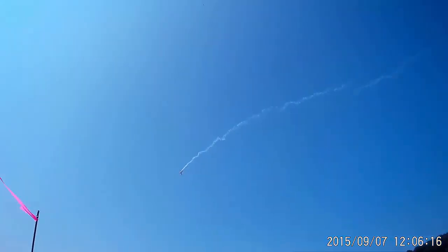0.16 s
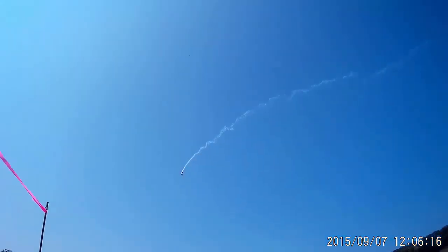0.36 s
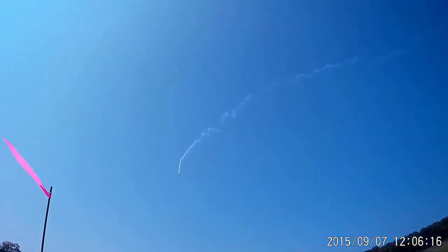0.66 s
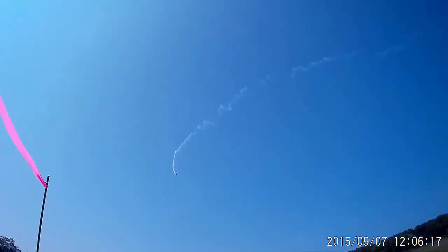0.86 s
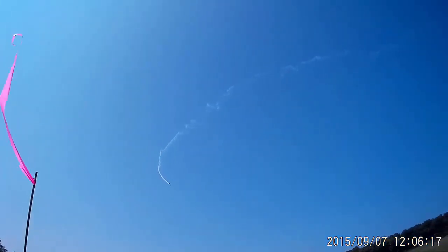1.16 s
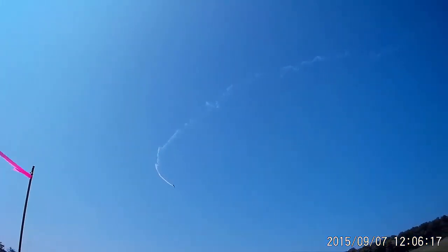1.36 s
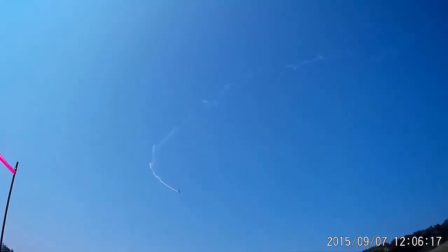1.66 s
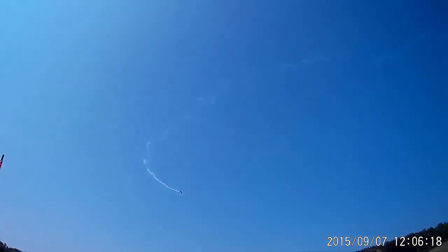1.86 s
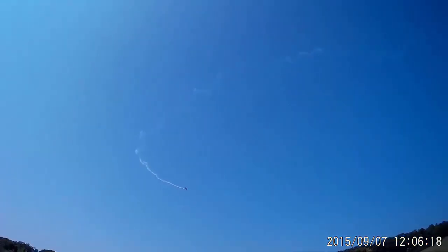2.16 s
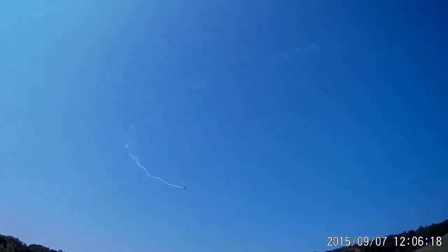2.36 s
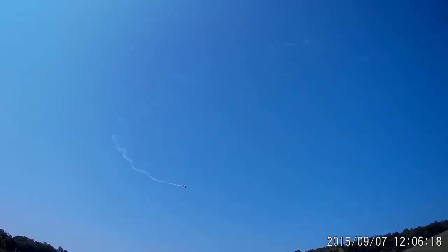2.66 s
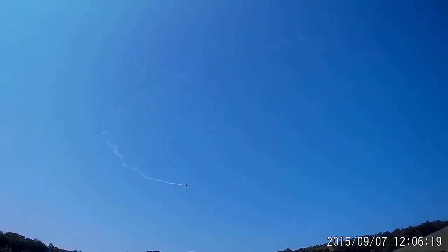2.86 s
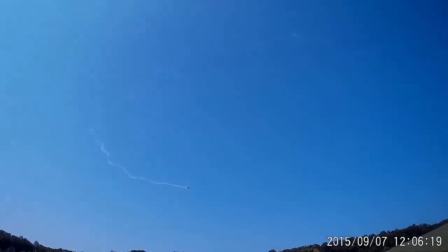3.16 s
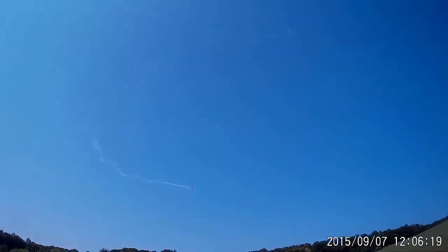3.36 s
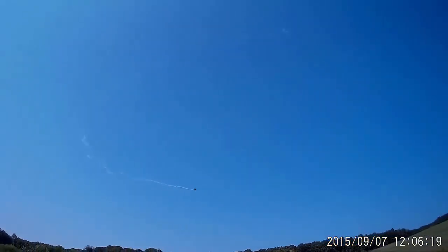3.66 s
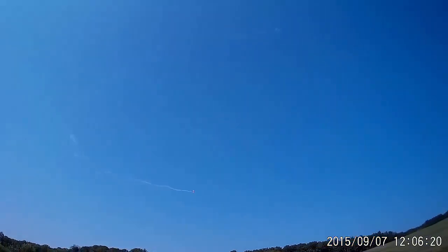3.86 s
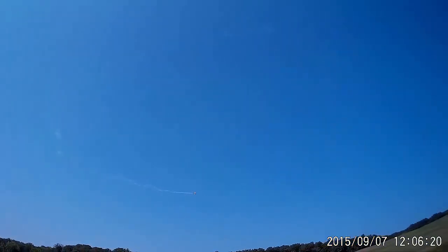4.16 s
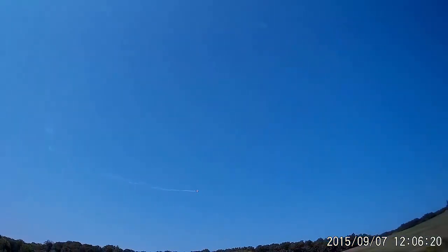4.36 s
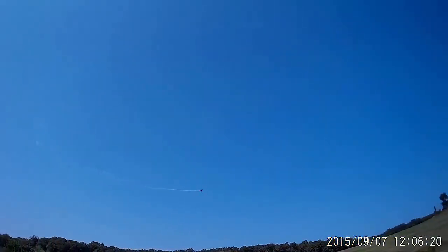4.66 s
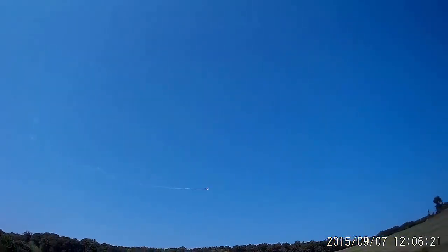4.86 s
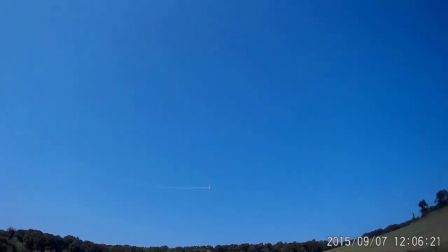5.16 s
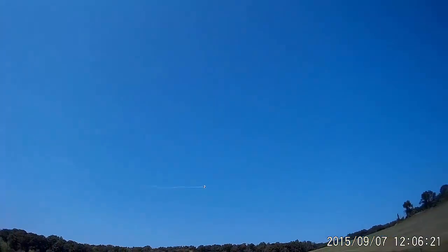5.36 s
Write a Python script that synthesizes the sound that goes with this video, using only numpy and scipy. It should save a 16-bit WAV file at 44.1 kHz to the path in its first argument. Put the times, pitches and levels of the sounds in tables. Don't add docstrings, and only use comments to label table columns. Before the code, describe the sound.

A far-off model plane's raspy buzz fades into a low propeller drone beneath strong buffeting wind, steady hiss and occasional tiny clicks.

```python
import sys
import numpy as np
from scipy import signal
from scipy.fft import rfft, irfft
from scipy.io import wavfile
from scipy.ndimage import uniform_filter1d

SR = 44100
rng = np.random.default_rng(int(sys.argv[2]) if len(sys.argv) > 2 else 0)


def dump_mix(stems):
    frames = np.atleast_2d(stems).T
    limited = np.clip(frames, -1, 1)
    pcm = np.round(limited * 32767).astype(np.int16)
    wavfile.write(sys.argv[1], SR, pcm)


N = 243431
T = np.arange(N) / SR

# start_s [s], firing_hz [Hz], hum_db [dB]
REVS = [(0.0, 110.7, -36), (.2, 109.3, -32), (.45, 108.3, -32), (.65, 106.5, -39), (1.06, 104, -41.5),
        (1.7, 103.8, -44), (2.1, 105.1, -36.5), (2.45, 105.7, -33), (2.68, 105.9, -35), (2.9, 105.1, -34.5),
        (3.3, 105.5, -29.5), (3.58, 106.1, -32), (3.88, 106.1, -35), (4.15, 107.5, -30), (4.62, 110.8, -41),
        (4.93, 109.6, -37), (5.3, 111.6, -35), (5.52, 111, -40)]
# start_s [s], level_db [dB], tail_on [0-1, view of the pipe], steady [0-1, firing over gas rush]
EXHAUST = [(0.0, -41.5, 0.6, 0.72), (.2, -39, 0.47, 0.72), (.4, -38, 0.43, 0.7), (.55, -40, 0.45, 0.57),
           (.7, -51, 0.72, .65), (1.08, -48, 0.67, 0.39), (1.17, -49.5, 0.56, 0.25), (1.6, -52, .7, 0.38),
           (2.0, -51.5, 0.76, 0.32), (2.4, -53, 0.62, 0.4), (2.68, -55.5, 0.84, 0.57),
           (3.05, -54, 0.56, 0.1), (3.55, -62, 0.95, 0.52), (3.95, -54, 0.37, 0.3), (4.35, -50, 0.43, 0.7),
           (4.75, -57.5, 0.03, 0.5), (5.1, -52, .2, 0.76), (5.52, -54, 0.67, 1)]
# pitch_hz [Hz], width_hz [Hz], level_db [dB]
PIPE = [(873, 270, -1), (1086, 245, 3.5), (1317, 266, 0.5), (1476, 212, 4.5), (1747, 580, 2.5),
        (2165, 480, -0.5), (3260, 590, 5.5), (3690, 740, -2), (4350, 600, 2.5), (5200, 1200, -44)]
# start_s [s], delay_ms [ms], echo [0-1]
GROUND = [(0, 5.5, 0.54), (.65, 5.07, 0.64), (1.25, 4.4, 0.3), (1.95, 3.9, 0.84), (2.75, 3.26, 1),
          (3.45, 3.54, 0.2), (4.3, 3.03, 0.8), (5.52, 3.15, 1.)]
# start_s [s], length_s [s], level_db [dB], centre_hz [Hz]
TWINKLES = [(0.0, 0.044, 6.5, 1250), (.0, .025, 7, 3320), (.155, 0.031, 13.5, 4470), (.2, 0.035, 3.5, 1500),
            (.32, .06, 5, 3600), (.075, .035, -9.5, 3500), (.34, 0.074, 9, 4800), (1.03, .1, -6, 4600),
            (.75, 0.042, 7.5, 4600), (.86, 0.097, 10.5, 2050), (.92, 0.066, 8, 3500), (1.07, .05, 9, 3000),
            (1.57, 0.11, 8, 1900), (1.7, 0.069, 8, 3400), (.6, 0.05, 5, 3020), (2.14, 0.031, 4.5, 1400),
            (2.33, 0.078, 6.5, 1950), (2.3, 0.051, 5, 1050), (2.62, 0.064, 10, 1500),
            (1.33, 0.38, -8, 2320), (3.45, 0.059, 9, 2100), (3.64, 0.016, 0, 1500), (3.85, 0.076, 8, 1700),
            (4.2, 0.046, 4.5, 1450), (4.53, 0.068, 7, 1500), (4.69, 0.055, -9, 1600), (4.83, .04, 9, 1500),
            (5.2, 0.076, 13, 1740), (5.2, .04, 13, 3500), (5.46, 0.034, 3.5, 1500)]
# start_s [s], length_s [s], level_db [dB], order [of firing rate]
BEAMS = [(.05, .1, 3.5, 11), (.1, .15, -13, 16), (.3, .2, 2.5, 14), (.35, .2, 3, 12), (.85, .2, 7, 23),
         (.85, 0.22, 7.5, 19.5), (1.2, .15, 8.5, 17), (1.5, .2, 7.5, 18), (2.0, 0.12, 6, 16),
         (2.05, 0.18, 9.5, 20.5), (2.35, .06, 10.5, 19), (2.5, 0.25, 12.5, 10), (2.6, .12, 9.5, 8),
         (2.32, .1, 6, 17), (1.08, .06, 10, 22), (2.6, 0.1, 3, 21), (2.5, 0.25, 10, 13), (2.82, .08, 5, 19),
         (3.0, .3, -0.5, 14), (3.1, .4, 8, 16), (3.82, .15, 9, 16), (3.85, .1, 7, 19), (4.2, .25, 5, 11),
         (5.15, .3, -7, 15), (4.5, .1, 3.5, 12), (4.7, .3, 8, 14), (4.7, .4, -6.5, 13), (5.25, .3, 6.5, 11),
         (5.3, .3, 3, 18), (5.2, .4, -3, 8)]
# start_s [s], level_db [dB], speed [0-1, above the usual]
WIND = [(0.0, -21, 0.65), (.3, -22.5, 0.7), (.55, -18.5, 0.65), (1.0, -20, 0.79), (1.35, -22, 0.77),
        (1.6, -23.5, 0.64), (1.9, -19, 0.47), (2.2, -22.5, 0.53), (2.5, -23, 0.43), (2.8, -25.5, 0.55),
        (3.2, -20, 0.46), (3.5, -24.5, 0.49), (3.8, -25, 0.42), (4.1, -18, .3), (4.55, -18.5, 0.37),
        (4.8, -21.5, 0.04), (5.35, -24.5, 0.21), (5.52, -35.5, 0.32)]
# pitch_hz [Hz], level_db [dB per Hz]
EDDIES = [(12, -44), (22, -9.5), (60, -1.5), (150, -2), (260, -9.5), (380, -18.5), (520, -30.5),
          (650, -43.5), (900, -70), (1500, -80.5)]
# start_s [s], length_s [s], level_db [dB], eddy_hz [Hz]
GUSTS = [(.14, 0.053, 11, 70.5), (.46, 0.054, 5, 150), (.6, 0.029, 6, 170), (.68, 0.0092, 12, 70),
         (.78, .03, -9, 60), (.35, 0.06, -3, 228), (.87, 0.045, -12.5, 60), (.92, 0.087, 8, 75),
         (1.15, 0.0059, 12.5, 130), (1.27, 0.032, 4, 60.3), (1.49, 0.036, 8.5, 90), (1.68, .04, 11.5, 170),
         (2.08, 0.055, 7.5, 220), (2.38, 0.069, -7, 99), (2.58, 0.041, 8, 171), (2.86, .03, -9, 179.9),
         (2.7, 0.033, -3, 420), (3.1, 0.049, 2.5, 420), (3.21, .05, 4, 90), (3.4, .03, 3, 120),
         (3.628, 0.034, 12.5, 130), (3.675, 0.024, -5, 170), (3.87, 0.061, 8.5, 130),
         (4.06, 0.03, 5.5, 220), (4.17, .015, -25, 250), (4.32, 0.019, 7.5, 170), (4.44, 0.014, 10, 149.2),
         (4.62, 0.057, 11.5, 200), (5.05, 0.047, -8.5, 130.6), (5.13, 0.052, 6.5, 190)]
# start_s [s], peak_db [dB], eddy_hz [Hz]
BUFFETS = [(0.086, -5, 214), (0.549, -7, 170), (.757, -4.5, 184), (.862, -7.5, 172), (1.097, -7, 190),
           (1.477, -6, 190), (2.038, -17, 171.6), (2.438, -7.5, 213), (2.953, -12.5, 175), (3.142, -7, 213),
           (3.21, -4, 267), (3.326, -14.5, 300.2), (3.641, -1.5, 245.3), (3.856, -8, 232),
           (4.119, -5.5, 176), (4.205, -5, 184), (4.436, -9, 158.2), (4.509, -4, 189), (4.621, -6, 170.9),
           (4.693, -4, 166.2), (4.734, -12, 217)]
# start_s [s], pitch_hz [Hz], level_db [dB]
CHIRP = [
    (1.78, 8250, -95),
    (1.79, 8270, -66),
    (1.845, 8370, -64),
    (1.88, 8420, -77),
    (1.9, 8420, -95),
]
# start_s [s], level_db [dB]
HISS = [(0.0, -60), (.28, -58.5), (.33, -54.5), (.68, -59.5), (.74, -61), (.89, -58), (1.12, -64.5),
        (1.47, -57.5), (2.04, -55), (2.57, -57.5), (3.2, -55), (3.86, -56), (4.06, -59), (4.5, -58),
        (4.7, -62), (4.97, -54.5), (5.07, -60.5), (5.3, -56)]
# pitch_hz [Hz], level_db [dB per Hz]
HISS_COLOUR = [(300, 17.5), (700, 14), (1500, 14.5), (2800, 4.5), (5200, 0.5), (12800, -3.5), (14000, -6.5),
               (15000, -17), (15400, -51), (16000, -60)]
# start_s [s], step [signed, full scale 1]
DROPOUTS = [
    (.28678, -0.052),
    (1.2866, 0.069),
    (2.285, -0.0087),
    (3.2867, -0.044),
    (5.2866, -0.045),
]


def firings(turns, steady):
    pulses = 0
    for order in range(6, 56):
        path_db = 1.3 * walk(9)
        if 7 < order < 25:
            path_db = path_db + swells(BEAMS, order, octaves=0.05)
        pulses = pulses + undb(path_db) * np.cos(2 * np.pi * order * turns + 0.22 * walk(6))
    puff = 0.5 + np.exp(-(turns % 1) / 0.5)
    gas = unit(puff * rng.standard_normal(N))
    return np.sqrt(steady) * unit(pulses) + np.sqrt(1 - steady) * 1.05 * gas


def off_the_ground(direct):
    delay_ms, echo = curves(GROUND)
    dull = uniform_filter1d(direct, size=9)
    bounce = np.interp(T - delay_ms / 1000, T, dull)
    return (direct + echo * bounce) / np.sqrt(1 + 1.3 * echo ** 2)


def exhaust(drive, level_db, tail_on):
    rings = []
    for hz, width, db in PIPE:
        flicker_db = hz / 1300 * walk(22) + swells(TWINKLES, hz, octaves=0.45)
        rings.append(undb(db + flicker_db) * band(drive, hz, width))
    main = unit(rings[2] - rings[3])
    lower = unit(rings[0] - rings[1])
    upper = unit(rings[4] - rings[5])
    rasp = unit(rings[6] - rings[7] + rings[8] - rings[9])
    mix = main + undb(-11 + 11 * tail_on) * lower
    mix = mix + undb(-10.5 + 17 * tail_on) * upper
    mix = mix + undb(-23 + 16.5 * tail_on) * rasp
    return undb(level_db) * mix


def propeller(turns, hz, third_db, exhaust_db):
    fifth_db = -52 + 0.58 * (exhaust_db + 49) + 7.5 * np.minimum(hz - 106, 0)
    hum = 0
    for order, db in [(3, third_db), (4, fifth_db - 9), (5, fifth_db), (6, fifth_db - 8.5)]:
        hum = hum + undb(db + 0.49 * walk(7.2)) * np.sin(2 * np.pi * order * turns)
    return np.sqrt(2) * hum


def aircraft():
    hz, third_db = curves(REVS)
    exhaust_db, tail_on, steady = curves(EXHAUST)
    turns = np.cumsum(hz * (1 + 0.0005 * walk(25))) / SR
    drive = off_the_ground(firings(turns, np.clip(steady, 0, 1)))
    return exhaust(drive, exhaust_db, tail_on) + propeller(turns, hz, third_db, exhaust_db)


def wind():
    wind_db, speed = curves(WIND)
    gust_octaves = 1.24
    rumble_db = wind_db + swells(GUSTS, 71.0, gust_octaves)
    flutter_db = wind_db - 10.5 + 14.5 * speed + swells(GUSTS, 175.0, gust_octaves)
    edge_db = wind_db - 33 + 22 * speed + swells(GUSTS, 270.0, gust_octaves)
    eddy = walk(30)
    rumble = undb(rumble_db + 0.18 + 0.78 * walk(4.47)) * unit(coloured(EDDIES, hi_hz=112.7))
    flutter = undb(flutter_db + 1.32 * eddy) * unit(coloured(EDDIES, lo_hz=108.5, hi_hz=337.0))
    edge = undb(edge_db + 6.0 + 2.0 * eddy + 1.5 * walk(45)) * unit(coloured(EDDIES, lo_hz=308.5))
    return buffeted(rumble + flutter + edge)


def buffeted(out):
    for s, db, hz in BUFFETS:
        near = slice(int(s * SR) - 3000, int(s * SR) + 3000)
        t = T[near] - s - 0.005
        out[near] *= 1 - 0.5 * np.exp(-(t / 0.0051) ** 2)
        out[near] -= undb(db - 2) * np.cos(2 * np.pi * hz * t) * np.exp(-(t / 0.0022) ** 2)
        out[near] -= undb(2.7 * db - 13.5) * np.exp(-np.abs(t) / 0.00064)
    return out


def insect():
    hz, db = curves(CHIRP)
    buzz = undb(-82 + 2.0 * walk(6)) * unit(band(rng.standard_normal(N), 8300, 350))
    chirp = undb(db + 1.5 * walk(88)) * np.sin(2 * np.pi * np.cumsum(hz) / SR)
    return buzz + chirp


def camera_hiss(heard):
    power = uniform_filter1d(heard ** 2, int(0.025 * SR))
    ride_db = 10 * np.log10(power + 1e-6) + 19
    return undb(curves(HISS)[0] + 6.5 + 0.24 * ride_db) * unit(coloured(HISS_COLOUR))


def undb(db):
    return np.exp(np.asarray(db) * (np.log(10) / 20))


def unit(x):
    return x / np.sqrt(np.mean(x ** 2))


def curves(table):
    s, *columns = np.transpose(table)
    return [np.interp(T, s, column) for column in columns]


def band(x, hz, width):
    b, a = signal.iirpeak(hz, hz / width, fs=SR)
    return signal.lfilter(b, a, signal.lfilter(b, a, x))


def coloured(colour, lo_hz=0.86, hi_hz=20000.):
    f = np.arange(1, N // 2 + 2) * SR / N
    hz, db = np.transpose(colour)
    edges = 1 / np.sqrt((1 + (lo_hz / f) ** 8) * (1 + (f / hi_hz) ** 8))
    shape = edges * undb(np.interp(np.log(f), np.log(hz), db))
    return irfft(rfft(rng.standard_normal(N)) * shape, N)


def walk(rate):
    hold_ms = int(1000 / rate)
    ms = np.arange(int(1000 * N / SR) + 2)
    held = rng.standard_normal(1000)[ms // hold_ms]
    slow = uniform_filter1d(uniform_filter1d(held, hold_ms), hold_ms)
    return np.interp(T, ms / 1000, unit(slow))


def swells(events, hz, octaves):
    s, length, db, centre_hz = np.transpose(events)[:, :, None]
    grid_s = np.arange(0, T[-1] + 0.004, 0.004)
    distance = ((grid_s - s) / length) ** 2 + (np.log2(centre_hz / hz) / octaves) ** 2
    bells = db * np.exp(-np.minimum(distance, 30))
    return np.interp(T, grid_s, bells.sum(axis=0))


def scene():
    return (aircraft() + wind() + insect())[None]


def band_limit(x):
    return signal.sosfilt(signal.butter(12, 16040, fs=SR, output="sos"), x)


def record(dry):
    lowpass = signal.ellip(12, 0.5, 90, 15200, fs=SR, output="sos")
    out = signal.sosfilt(lowpass, dry + camera_hiss(dry[0]))
    for s, step in DROPOUTS:
        near = slice(int(s * SR) - 200, int(s * SR) + 200)
        t = T[near] - s
        out[:, near] += step * np.sinc(t * 32000) * np.exp(-(t / 0.0004) ** 2)
    return band_limit(out)


dry = scene()
out = record(dry)
dump_mix(out)
```